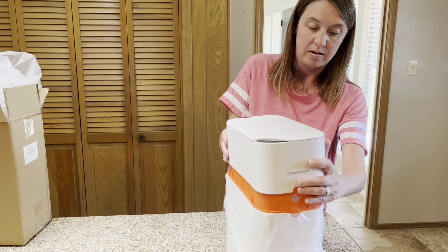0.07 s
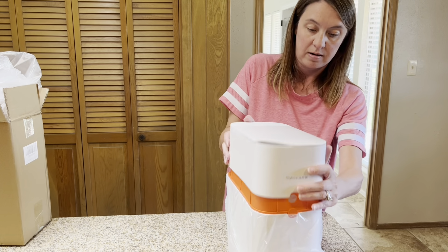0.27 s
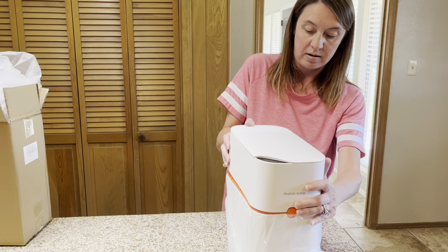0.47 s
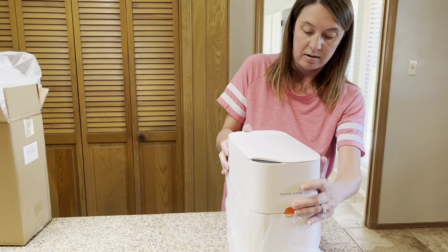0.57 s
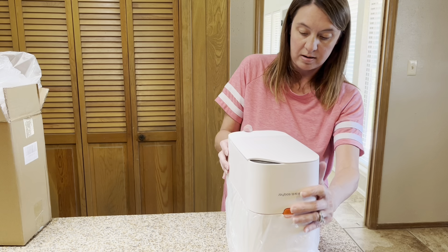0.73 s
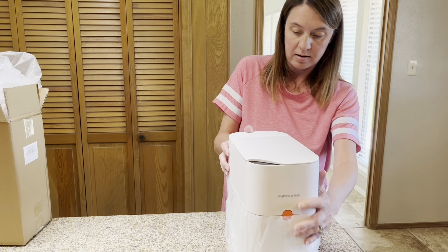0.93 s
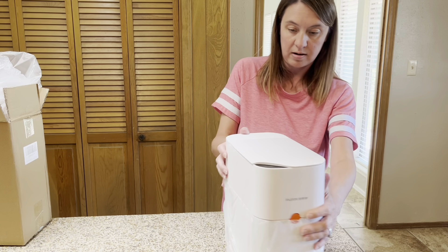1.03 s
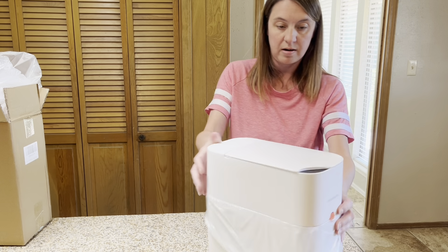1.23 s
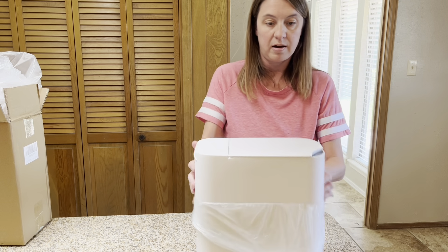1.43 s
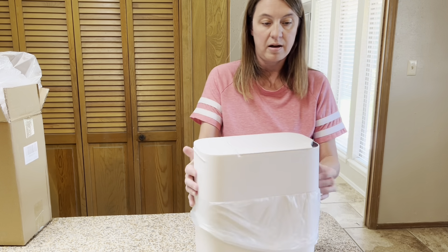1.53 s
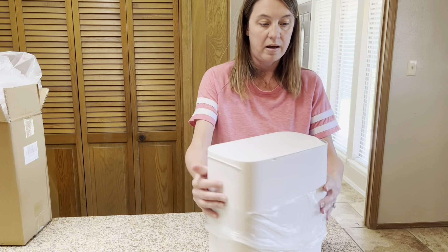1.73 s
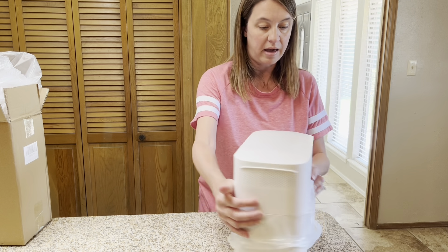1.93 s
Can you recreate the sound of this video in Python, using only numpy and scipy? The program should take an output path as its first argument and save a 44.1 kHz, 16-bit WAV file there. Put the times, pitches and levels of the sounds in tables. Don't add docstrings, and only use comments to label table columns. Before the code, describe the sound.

Two loud plastic clicks with a short rim rattle and hollow boom, preceded by soft rubbing and bumps, followed by gentle handling, light scuffs and faint film rustle, recorded close in a reverberant indoor room.

```python
import sys
import numpy as np
from scipy import signal
from scipy.fft import rfft, irfft, next_fast_len
from scipy.io import wavfile
from scipy.ndimage import uniform_filter1d

SR = 44100
rng = np.random.default_rng(int(sys.argv[2]) if len(sys.argv) > 2 else 0)


def generate_wav(sig):
    pcm = np.round(np.clip(np.atleast_2d(sig).T, -1, 1) * 32767).astype(np.int16)
    wavfile.write(sys.argv[1], SR, pcm)


def voltage_ratio(decibels):
    exponent = np.asarray(decibels, float) / 20
    return 10 ** exponent


N = 88200
TIME = np.arange(N) / SR
SIZE = next_fast_len(N + SR)
BINS_HZ = np.maximum(np.arange(SIZE // 2 + 1) * SR / SIZE, 1)


def rms_one(x):
    return x / np.sqrt(np.mean(x ** 2) + 1e-20)


def at_hz(points, hz):
    p = np.array(points, float)
    return np.interp(np.log(hz), np.log(np.maximum(p[:, 0], 1)), p[:, 1])


def level(rows):
    s, db = np.transpose(rows)
    return voltage_ratio(np.interp(TIME, s, db)) * (TIME >= s[0]) * (TIME <= s[-1])


def colour(x, points):
    inside = (BINS_HZ > points[0][0]) * (BINS_HZ < points[-1][0])
    spectrum = rfft(x, SIZE) * voltage_ratio(at_hz(points, BINS_HZ)) * inside
    return rms_one(irfft(spectrum, SIZE)[..., :N])


def drift(rate_hz):
    count = int(2 * rate_hz) + 3
    return np.interp(TIME * rate_hz, np.arange(count), rng.standard_normal(count))


def clicks(s, gains):
    out = np.full(N, 1e-18)
    np.add.at(out, (np.asarray(s) * SR).astype(int), gains)
    return out


def grains(rate_hz, spread_db):
    struck = rng.random(N) < rate_hz / SR
    strength = voltage_ratio(spread_db * np.minimum(rng.exponential(1, N), 5))
    return struck * strength * rng.choice([-1, 1], N)


def soften(x, hz):
    r = np.exp(-2 * np.pi * hz / SR)
    return signal.lfilter([(1 - r) ** 2], [1, -2 * r, r * r], x)


def ring(x, hz, t60_s):
    r, w = voltage_ratio(-60 / (t60_s * SR)), 2 * np.pi * hz / SR
    return signal.lfilter([0, np.sin(w)], [1, -2 * r * np.cos(w), r * r], x)


def dying(s, db, t60_s):
    return (TIME >= s) * voltage_ratio(db - 60 * np.maximum(TIME - s, 0) / t60_s)


def catches():
    # start_s, strength_db, contact_cutoff_hz
    snaps = [(.3784, -9.5, 3200), (.3792, -4, 3000), (.3809, -10, 1600), (.3843, -15, 2000),
             (.3935, -20, 1600), (.3968, -19, 1600), (.3985, -20, 1600), (.54025, -1.5, 2800),
             (.5412, -3, 1300), (.544, -8, 1200), (.566, -13, 1300)]
    # mode_hz, level_db, t60_s
    first_shell = [(500, -11, .021), (807, -5, .03), (994, -5, .03), (1386, -8, .035), (2100, 2, .007),
                   (2450, -5, .015), (2800, -3, .007), (3600, -9, .01), (4400, -10, .01)]
    # mode_hz, level_db, t60_s
    second_shell = [(392, -11, .021), (560, -10, .04), (720, -7, .017), (900, -5, .012), (1174, -10, .06),
                    (1485, -11, .02), (1840, -1, .012), (2150, 2, .009), (2600, -8, .012), (3500, -7, .007)]
    second_catch_s, shell_gain = .5, .36
    out = 0
    for (s, db, hz), luck_db in zip(snaps, rng.normal(0, 1, (len(snaps), 10))):
        hit = soften(soften(soften(clicks([s], voltage_ratio(db)), hz), hz), 2 * hz)
        hit = hit - soften(hit, .5 * hz)
        shell = first_shell if s < second_catch_s else second_shell
        for k, (mode_hz, mode_db, t60_s) in enumerate(shell):
            out = out + shell_gain * ring(hit, mode_hz, t60_s) * voltage_ratio(mode_db + luck_db[k])
    return out


def rim_chatter():
    # start_s, level_db, t60_s
    bursts = [
        (0.378, -22, 0.086),
        (0.5421, -28, 0.12),
    ]
    # hz, level_db
    tone = [(300, -1.5), (1000, 0), (2200, -10.5), (4200, -12), (7500, -26.5)]
    envelope = uniform_filter1d(sum(dying(*burst) for burst in bursts), size=40)
    return colour(grains(4000, 1.8), tone) * envelope


def edge_spits():
    # start_s, peak_db, t60_s
    spits = [(.0725, -60, .008), (.1147, -62, .02), (.3035, -60, .01), (.345, -62, .01), (.3787, -40, .005),
             (.3821, -23.5, .008), (.4117, -27, .008), (.515, -53, .08), (.545, -54, .08),
             (1.118, -56, .03), (1.2312, -49, .008), (1.247, -54, .006), (1.3028, -52, .008),
             (1.697, -47, .035), (1.712, -51, .04)]
    bright = colour(rng.standard_normal(N), [(1500, -9), (6000, -6), (15800, 1)])
    return bright * uniform_filter1d(sum(dying(*spit) for spit in spits), size=16)


def hollow_bin():
    # start_s, strength_db, favoured_pitch_hz
    thuds = [(.003, -29, 204.5), (0.036, -35.5, 196), (0.142, -31, 218), (0.155, -30, 128.4),
             (0.275, -28, 200.5), (0.313, -26, 235), (0.345, -21, 154.6), (0.381, -16.5, 258),
             (0.399, -16.5, 163), (.525, -22.5, 177.5), (0.539, -11.5, 150), (0.575, -45, 144),
             (0.97, -32, 163), (1.001, -59, 160), (1.068, -52, 118), (1.224, -31, 69), (1.252, -29, 174),
             (1.27, -36.5, 175), (1.281, -45, 168), (1.307, -61, 156), (1.341, -41, 118), (1.504, -32, 173),
             (1.534, -30.5, 236), (1.559, -34.5, 260), (1.587, -30, 186), (1.6, -34.5, 169),
             (1.711, -25.5, 164.3), (1.791, -43, 167), (1.861, -41.5, 195.6)]
    # mode_hz, level_db, t60_s
    modes = [(61, 1, 0.34), (92, 3, 0.027), (118, -2.5, 0.11), (163, 3.5, 0.08), (189.5, 9.5, 0.045),
             (205.2, 5.5, 0.052), (258, -8.5, 0.068), (334, -9, 0.25), (346, 2.5, 0.01)]
    wall_db, wall_t60_s = -3.5, 0.09
    off_pitch_db_per_octave, push_cutoff_hz = 17, 500
    s, db, favoured_hz = np.transpose(thuds)
    luck_db = rng.normal(0, 1.5, (len(s), len(modes)))
    out = sum(ring(clicks([t], voltage_ratio(g + wall_db)), hz, wall_t60_s) for t, g, hz in thuds)
    for k, (hz, mode_db, t60_s) in enumerate(modes):
        loss_db = off_pitch_db_per_octave * abs(np.log2(hz / favoured_hz))
        pushes = clicks(s, voltage_ratio(db + mode_db + luck_db[:, k] - loss_db))
        out = out + (-1) ** k * ring(pushes, hz, t60_s)
    return soften(out, push_cutoff_hz)


def lid_slide():
    # time_s, level_db
    strokes = [
        [(0, -54.5), (.03, -67.5), (.052, -51), (.1, -66), (.118, -54), (.14, -44), (.16, -60), (.26, -66)],
        [(.272, -53), (.282, -48), (.305, -44), (.33, -49.5), (.377, -55)],
    ]
    # time_s, level_db
    last_stroke = [(.47, -62), (.515, -42), (.53, -41), (.539, -43)]
    # hz, level_db
    tone = [(250, 13), (500, 1.5), (1000, -2), (2200, -10.5), (4500, -20.5), (8000, -33), (15000, -31.5)]
    envelope = uniform_filter1d(sum(map(level, [*strokes, last_stroke])), size=40)
    return envelope * voltage_ratio(2.5 + 2 * drift(93.3)) * colour(grains(6000, 1.6), tone)


def light_ticks():
    # start_s, peak_db, ring_hz
    touches = [(0.073, -61, 4160), (.1147, -53, 2570), (0.1194, -48, 1240), (.1366, -45.5, 2270),
               (0.2728, -48.5, 1050), (0.2822, -42, 1320), (0.3, -47, 2270), (1.232, -49, 1160),
               (1.238, -47, 890), (1.301, -53, 1050), (1.503, -54, 2780), (1.5292, -50, 2980),
               (1.555, -55, 3080), (1.559, -53, 2520), (1.5815, -57, 3100), (1.699, -49, 2000),
               (1.699, -64, 3380)]
    t60_s, puff_db, puff_t60_s = 2.2 / 1000, -9, .03
    puff = colour(rng.standard_normal(N), [(400, 0), (2000, -3), (8000, -12)])
    out = 0
    for s, db, hz in touches:
        out = out + ring(ring(clicks([s], voltage_ratio(db - 3.5)), hz, t60_s), hz, t60_s)
        out = out + puff * dying(s, db + puff_db, puff_t60_s)
    return out


def hand_drag():
    # time_s, level_db
    drag = [(.8, -65.5), (1.2, -66), (1.235, -53), (1.27, -54), (1.31, -64), (1.42, -59.5), (1.5, -56.5),
            (1.56, -52), (1.61, -55), (1.67, -63), (1.72, -63.5), (2, -64)]
    # hz, level_db
    tone = [(200, 5), (350, 5.5), (600, -6), (1200, -12.5), (3000, -41)]
    return level(drag) * voltage_ratio(1.5 + 2 * drift(41.02)) * colour(rng.standard_normal(N), tone)


def base_squeak():
    # time_s, pitch_hz, level_db
    glide = [
        (1.661, 998, -77),
        (1.75, 1054, -75.5),
        (1.832, 1134, -76),
    ]
    s, hz, db = np.transpose(glide)
    fade = np.clip(np.minimum(TIME - s[0], s[-1] - TIME) / 0.038, 0, 1)
    phase = 2 * np.pi * np.cumsum(np.interp(TIME, s, hz)) / SR
    return 4.5 * fade * voltage_ratio(np.interp(TIME, s, db) + drift(43.0)) * np.sin(phase)


def base_scuff():
    # mode_hz, level_db
    modes = [(760, -58), (2700, -56), (3200, -63), (3970, -60)]
    start_s, rise_s, t60_s = 1.968, .022, .01
    white = rng.standard_normal(N)
    scuff = sum(voltage_ratio(db) * rms_one(ring(white, hz, t60_s)) for hz, db in modes)
    return scuff * np.clip((TIME - start_s) / rise_s, 0, 1) ** 2


def bag_rustle():
    # time_s, level_db
    stirring = [(0, -106), (.04, -98.5), (.13, -67.5), (.25, -83.5), (.31, -85), (.37, -70), (.64, -76),
                (.77, -67), (.86, -72), (1, -68.5), (1.15, -69), (1.25, -74), (1.35, -75), (1.42, -71),
                (1.5, -71.5), (1.59, -70.5), (1.68, -75.5), (1.7, -61.5), (1.78, -67.5), (1.85, -64.5),
                (2, -68.5)]
    # hz, level_db
    tone = [(500, -12), (1500, -2), (4000, 1), (7000, -2.5), (15800, 0.5)]
    crinkles_per_s, crinkle_db = 7500, 8.5
    crinkles = rms_one(np.array([grains(crinkles_per_s, 0.68) for _ in range(2)]))
    film = rng.standard_normal((2, N)) + voltage_ratio(crinkle_db) * crinkles
    return level(stirring) * voltage_ratio(9 + 0.75 * drift(32.42)) * colour(film, tone)


def room(x):
    # hz, t60_s
    decay = [(60, 0.47), (170, 0.29), (500, 0.48), (1200, 0.7), (3000, 0.56), (6000, 0.45), (14000, 0.12)]
    # hz, level_db
    tone = [(100, 6.5), (700, -1), (3000, 1.5), (7000, 5)]
    room_db, gap_s, air_loss_hz = -5, 0.0016, 17000.0
    t, tail = np.arange(SR * 3 // 4) / SR, 0
    white = rng.standard_normal((2, 2, len(t)))
    for k, low_hz in enumerate(30 * 2. ** np.arange(9)):
        octave = signal.butter(2, [low_hz, 2 * low_hz], "band", fs=SR, output="sos")
        band = signal.sosfilt(octave, white[k % 2])
        t60_s = at_hz(decay, np.sqrt(2) * low_hz)
        fall = voltage_ratio(at_hz(tone, 1.4 * low_hz) - 60 * t / t60_s)
        tail = tail + band * fall * np.sqrt(13.8 / t60_s / SR)
    tail = tail * np.clip(t / gap_s - 1, 0, 1)
    sent = rfft(x, SIZE) / (1 + (BINS_HZ / air_loss_hz) ** 2)
    return voltage_ratio(room_db) * irfft(sent * rfft(tail, SIZE), SIZE)[:, :N]


def room_floor():
    # hz, level_db
    tone = [(20, 9), (60, 7.5), (120, 4), (300, -18), (800, -29), (1800, -33.5), (7000, -56)]
    return voltage_ratio(-52 + drift(2.6)) * colour(rng.standard_normal((2, N)), tone)


def scene():
    lid = catches() + rim_chatter() + edge_spits() + lid_slide()
    handling = light_ticks() + hand_drag() + base_squeak() + base_scuff()
    radiation = signal.butter(2, 42, "high", fs=SR, output="sos")
    direct = signal.sosfilt(radiation, lid + hollow_bin() + handling)
    mid, side = room(direct) + bag_rustle() + room_floor()
    return np.array([direct + mid + side, direct + mid - side])


def microphone_ports(dry):
    # hz, level_db
    width = [(60, -26), (200, -14.5), (400, -1.5), (800, -0.5), (1400, 4), (2200, -11.5), (4500, -3.5),
             (6500, -7.5)]
    # hz, half_turns
    lead = np.array([(0, 0), (1210, -.2), (1810, .05), (4650, .1), (6720, -.35), (7400, -.6), (7900, -1),
                     (9000, -1), (10200, -1.5), (11100, -2), (13100, -2.2), (15000, -3)])
    # hz, level_db
    tilt = [(400, 0), (1290, -2), (2380, 1), (4400, 3), (7500, 0)]
    treble_width_db, mic_cut_hz = -21, 79
    mid = rfft(dry[0] + dry[1], SIZE) / 2
    side = rfft(dry[0] - dry[1], SIZE) / 2
    side = side * voltage_ratio(np.where(BINS_HZ < 7200, at_hz(width, BINS_HZ), treble_width_db))
    cut = 1 / (1 - 1.4j * mic_cut_hz / BINS_HZ - (mic_cut_hz / BINS_HZ) ** 2)
    half_turns = np.interp(BINS_HZ, lead[:, 0], lead[:, 1])
    turn = voltage_ratio(at_hz(tilt, BINS_HZ) / 2) * np.exp(.5j * np.pi * half_turns)
    ports = np.array([(mid + side) * turn, (mid - side) / turn])
    return irfft(ports * cut, SIZE)[:, :N]


def top_cut(x):
    return signal.sosfilt(signal.butter(12, 15790, fs=SR, output="sos"), x)


def record(dry):
    mix = microphone_ports(dry)
    return top_cut(mix)


dry = scene()
out = record(dry)
generate_wav(out)
```